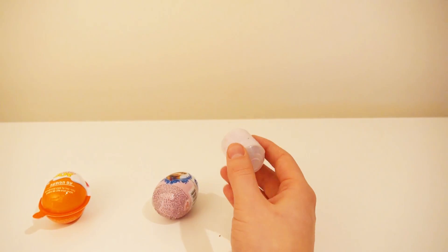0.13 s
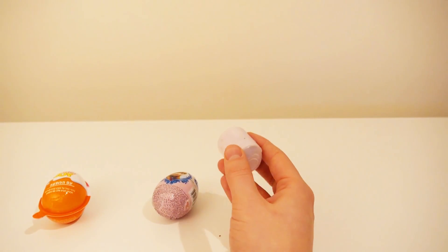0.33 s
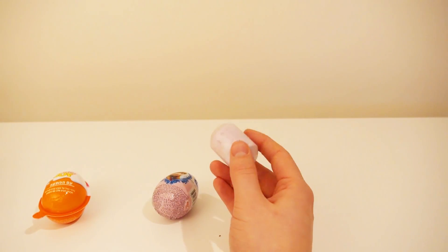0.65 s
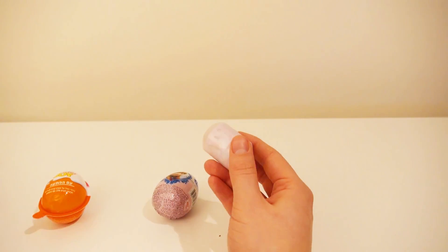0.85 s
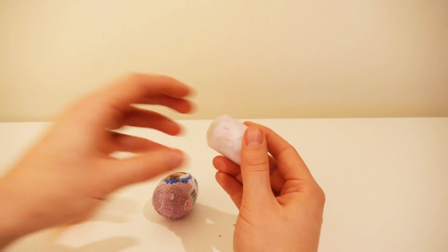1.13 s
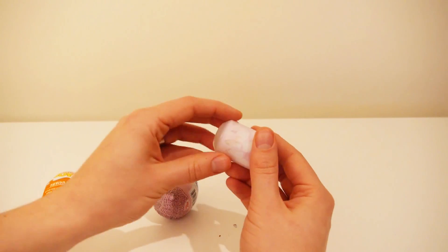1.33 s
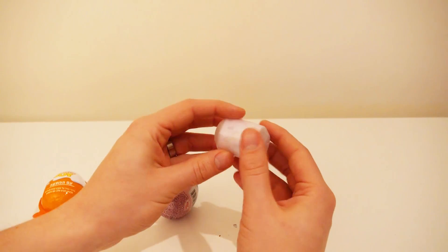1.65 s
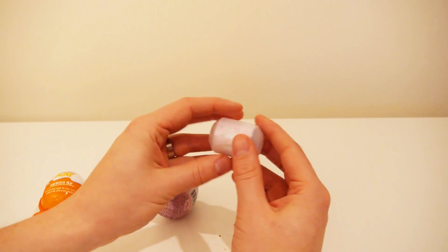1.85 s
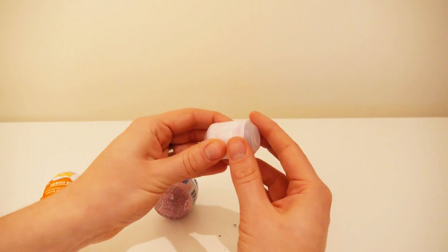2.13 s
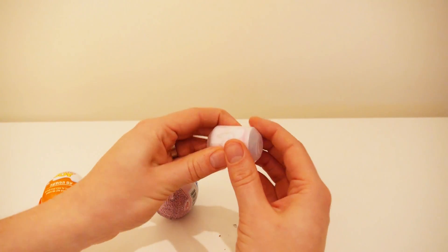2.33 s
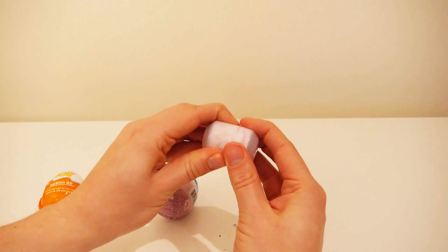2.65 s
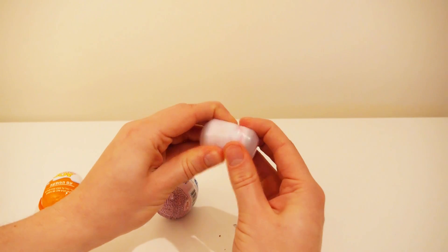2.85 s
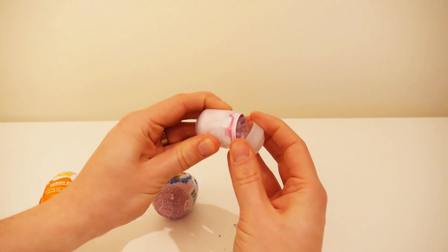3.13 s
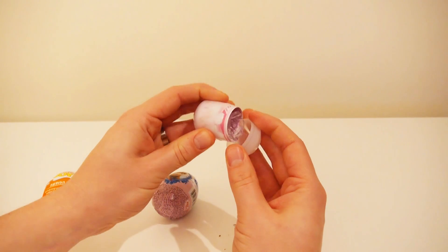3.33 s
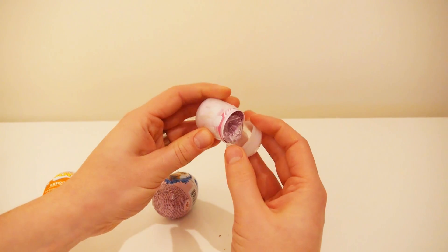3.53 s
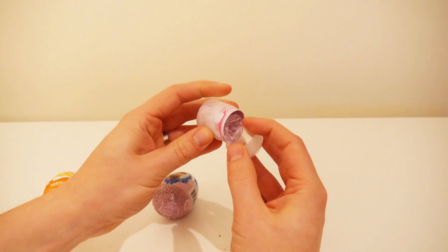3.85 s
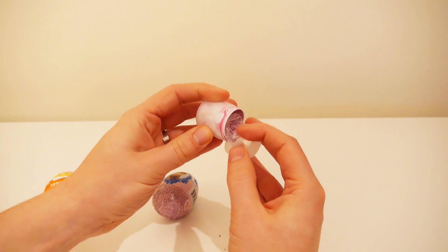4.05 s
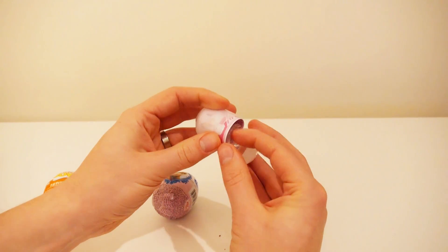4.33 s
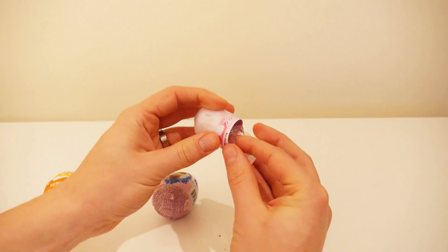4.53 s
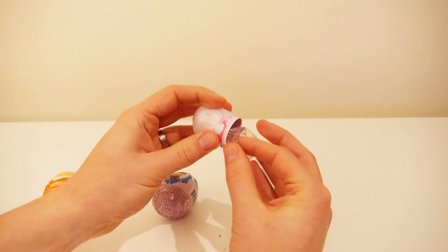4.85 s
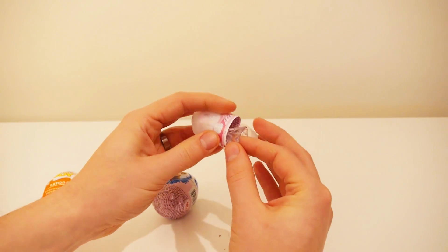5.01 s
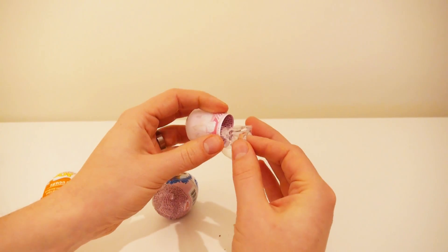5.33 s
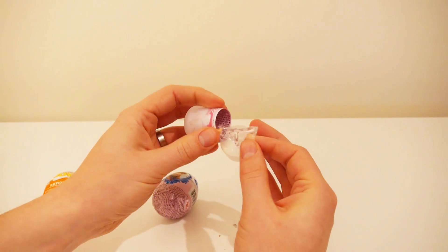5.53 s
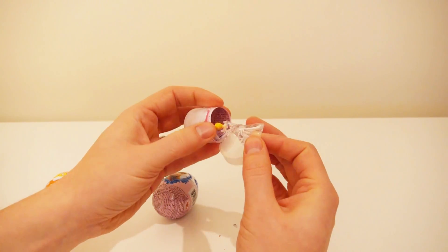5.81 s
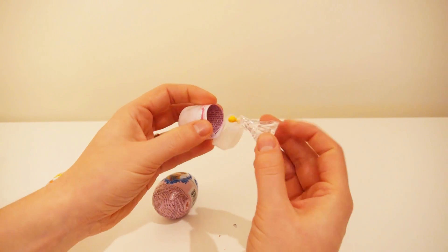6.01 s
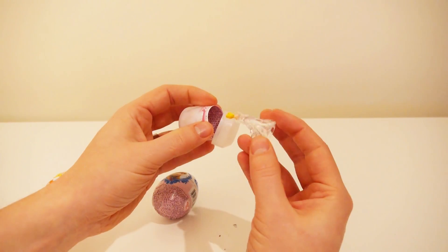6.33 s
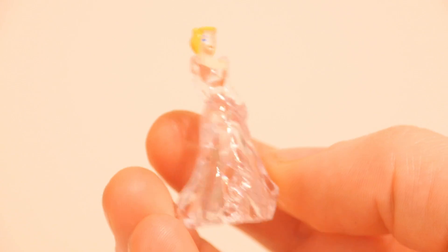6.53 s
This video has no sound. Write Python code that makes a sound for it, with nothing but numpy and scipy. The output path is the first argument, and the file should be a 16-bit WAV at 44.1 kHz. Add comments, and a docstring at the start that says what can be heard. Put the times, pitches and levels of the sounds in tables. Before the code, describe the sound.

Thin plastic crackles under fingers, a small capsule lid pops open and scrapes, then after near silence a hard little figure clacks out.

```python
"""A small plastic toy capsule is turned in the fingers above a table in a quiet room.
Its thin wrapping rustles and crackles: trains of tiny slips ring the facets of the plastic.
The lid lets go with a hollow pop, low damped modes, and scrapes off in short runs of slips.
A hard little figure taps the cup, ringing cup and wall modes, then clacks on the rim as it is drawn out:
short modes of its own, and a grainy ring that lingers and fades, over faint rumble, hiss and hum."""
import sys
import numpy as np
from scipy import signal
from scipy.fft import rfft, irfft
from scipy.io import wavfile

SR = 44100
rng = np.random.default_rng(int(sys.argv[2]) if len(sys.argv) > 2 else 0)


def dump(signal):
    """Clip the signal to [-1, 1] and save it as 16-bit WAV at the path in sys.argv[1]."""
    limited = np.clip(np.atleast_2d(signal).T, -1, 1)
    pcm = np.round(limited * 32767).astype(np.int16)
    wavfile.write(sys.argv[1], SR, pcm)


N = 294407  # length [samples]
POP_S = 2.9908  # moment the lid lets go [s]

# stick-slip bursts of thin plastic: (time [s], level [dB], brightness [dB per octave])
CRACKLES = [(0.044, -44, 1.5), (.068, -44, 11), (0.2127, -30, -2.5), (.245, -41.5, -5.5), (.548, -38.5, -1),
            (0.58, -42, -0.5), (.670, -40.5, 2.5), (0.82, -56.5, -0.5), (0.872, -67, 12),
            (1.012, -56.5, 16), (1.168, -58, 19), (2.3118, -48.5, 3.5), (2.982, -45, -3), (3.135, -65, 11),
            (4.786, -67, 2.5), (4.942, -61.5, 22)]
# how the thin plastic colours a slip: (frequency [Hz], level [dB])
CRACKLE_COLOUR = [(300, -34), (700, -32), (1300, -10.5), (1650, -6), (2100, 3.5), (3000, 1.5), (3600, -3.5),
                  (4600, -0.5), (6800, -12.5), (10000, -15), (15500, -34)]
# knocks on the cup, whose pitch shifts with the grip:
# (time [s], pitch [Hz], level [dB], wall ring relative to that level [dB])
KNOCKS = [(0.584, 860, -42.5, -35), (0.602, 1120, -45.5, -34), (0.608, 442, -52.5, -35),
          (1.81, 2110, -68, -25), (2.067, 2020, -80, 7.5), (3.141, 1240, -52, -40),
          (3.541, 1640, -65.5, -26), (3.6514, 1686, -35.5, -14), (3.654, 2165, -48, -5.5),
          (3.851, 1583, -68.5, -19), (4.3131, 1598, -67, 6), (4.319, 1625, -59, 4), (4.868, 2005, -80, 14),
          (5.3184, 1705, -42.5, -18.5), (5.798, 1840, -32, -5), (5.974, 1145, -27.5, -20.5),
          (6.0116, 1800, -26, -20), (6.089, 1830, -46.5, -23)]
# modes of the hard figure: (frequency [Hz], level [dB], t60 [s])
FIGURE_MODES = [(1460, -23, 0.011), (1970, -21.5, 0.0038), (3126, -33, 0.074), (3065, -11, 0.0098),
                (3380, -33.5, .2), (3388, -0.5, 0.0022), (3460, -29, 0.1), (3720, -30.5, 0.07),
                (4200, -22, 0.011), (4570, -34.5, .14), (5340, -27, 0.0047), (7780, -38.5, 0.0075),
                (12500, -50, .006)]


def amp(db):
    """Decibels to gain."""
    return 10 ** (np.asarray(db) / 20)


def unit(x):
    """Scales to an rms of 1."""
    return x / np.sqrt(np.mean(x ** 2) + 1e-20)


def read(points, hz):
    """Reads a table on a log-frequency axis."""
    f, value = np.transpose(points)
    return np.interp(np.log(hz + 1), np.log(f + 1), value)


def add(mix, s, sound):
    """Mixes a sound in at time s."""
    part = mix[max(round(s * SR), 0):][:len(sound)]
    part += sound[:len(part)]


def octaves(hz):
    """Octaves above 3500 Hz, the middle of the plastic's range; held constant below 500 Hz."""
    return np.log2(np.maximum(hz, 500) / 3500)


def shortened(db, at_db, halving_db):
    """Factor on a duration: 1 at the given level, half as long for each step of halving_db above it."""
    return 2 ** ((at_db - db) / halving_db)


def snap(colour, bright=0, ripple_db=0, size=2048, count=70):
    """A causal click of unit energy with the given spectrum; ripples give each facet its own resonances."""
    hz = abs(np.fft.fftfreq(size, 1 / SR))
    ripple = np.interp(hz, np.linspace(0, SR / 2, count), rng.standard_normal(count))
    log_gain = np.log(amp(read(colour, hz) + bright * octaves(hz) + ripple_db * ripple))
    # minimum phase packs the energy at the start
    click = np.fft.ifft(np.exp(np.conj(signal.hilbert(log_gain)))).real
    return click / np.linalg.norm(click)


def ring(modes, swell_s, bright=0, size=10000):
    """Damped modes that swell while the contact lasts, round off and then die away."""
    t = np.arange(size) / SR
    out = 0
    swell = np.sin(np.pi / 2 * np.minimum(t / swell_s, 1)) ** 2
    # the decay sets in gradually once the swell is over
    age = np.hypot(np.maximum(t - swell_s, 0), swell_s / 2) - swell_s / 2
    for hz, db, t60 in modes:
        level = amp(db + bright * octaves(hz) - 60 * age / t60)
        out = out + level * np.sin(2 * np.pi * hz * t)
    return swell * out


def slips(count, per_s, spread_db):
    """A random train of tiny slips of either sign, a few of them much larger than the rest."""
    chance, size, sign = rng.random((3, count))
    size = np.minimum(-np.log(1 - size), 4)
    return (chance < per_s / SR) * amp(spread_db * size) * np.sign(sign - .5)


def bursts(rows, colour, per_s, spread_db):
    """Each burst is a short run of slips that swells and fades, all ringing the thin plastic."""
    rise, rise_per_s = 0.087, 12  # share of a burst spent swelling; a longer burst starts more softly
    out = np.zeros(N)
    for s, db, length, bright in rows:
        count = max(int(length * SR), 8)
        train = (slips(4096, per_s, spread_db) + .15 * rng.standard_normal(4096))[:count]
        peak_at = np.clip(rise + rise_per_s * length, .01, .9)
        train = train * np.interp(np.linspace(0, 1, len(train)), [0, peak_at, 1], [0, 1, .2])
        sound = signal.fftconvolve(train, snap(colour, bright, ripple_db=3))
        packed = sound / np.linalg.norm(sound) * np.sqrt(SR / 1000)  # level as if packed in 1 ms
        add(out, s, amp(db) * packed)
    return out


def background(side=0.11):
    """Low rumble, faint hiss and a weak electrical hum, nearly mono."""
    # spectrum of the steady background noise, shape only: (frequency [Hz], level [dB])
    floor = [(18, -31.5), (30, 4), (107, -9), (150, -14.5), (195, -10.5), (260, -16), (415, -18),
             (567, -24.5), (612, -19.5), (698, -24), (1060, -25.5), (1370, -29.5), (10700, -51.5),
             (12200, -61.5), (15000, -53.5)]
    # steady hum tones: (frequency [Hz], rms level [dB])
    hum = [(49, -80.5), (205, -82), (238, -83.5), (604, -91.5)]
    floor_db = -68.5
    hz = np.fft.rfftfreq(N, 1 / SR)
    t = np.arange(N) / SR
    spectrum = rfft(rng.standard_normal((2, N))) * amp(read(floor, hz))
    mid, wide = amp(floor_db) * unit(irfft(spectrum, N))
    mid = mid + sum(np.sqrt(2) * amp(db) * np.sin(2 * np.pi * (f * t + rng.random())) for f, db in hum)
    return np.array([mid + side * wide, mid - side * wide])


def stroke(age, length, db):
    """Finger pressure: grips quickly, eases while sliding, then lets go."""
    rise_s, sag_db_per_s, release_db_per_s = 0.007, 39.5, 217
    sag_db = sag_db_per_s * np.maximum(age, 0)
    release_db = release_db_per_s * np.maximum(age - length, 0)
    return np.clip(age / rise_s, 0, 1) * amp(db - (sag_db + release_db))


def rubbing(per_s, spread_db, gain_db, count=6):
    """Dense fine slips under the fingers, which wander from one facet of the wrapping to the next."""
    # how the rubbed wrapping colours a slip: (frequency [Hz], level [dB])
    rub_colour = [(350, -51), (600, -32.5), (678, -22.5), (1390, -8), (1640, -1), (2130, -12), (2280, 0),
                  (2790, 2.5), (3070, -6), (5080, -3.5), (5510, -13), (8870, -14), (15500, -23)]
    # strokes of the fingers over the wrapped capsule: (time [s], length [s], level before gain_db [dB])
    strokes = [(0.0, .2, -47.5), (0.418, 0.12, -73.5), (0.529, 0.19, -55)]
    t = np.arange(N) / SR
    grain = 0
    pressure = sum(stroke(t - s, length, db) for s, length, db in strokes)
    steps = np.arange(0, t[-1], .02)  # each facet's share moves to a new value every 20 ms
    touch = np.array([np.interp(t, steps, rng.random(len(steps)) ** 3) for _ in range(count)])
    for share in touch / np.linalg.norm(touch, axis=0):
        facet = snap(rub_colour, ripple_db=4.5)
        grain = grain + signal.oaconvolve(share * slips(N, per_s / count, spread_db), facet)[:N]
    return amp(gain_db) * pressure * unit(grain)


def crackling():
    """The wrapping buckles in bursts, the hard ones short and the soft ones drawn out."""
    length_s, at_db, halving_db = 0.0092, -39.5, 27  # length at that level; a harder burst is over sooner
    rows = []
    for s, db, bright in CRACKLES:
        rows.append((s, db, length_s * shortened(db, at_db, halving_db), bright))
    return bursts(rows, CRACKLE_COLOUR, per_s=1600, spread_db=3.0)


def soft_rasps(per_s=3000, spread_db=3.5):
    """Trains of fine slips through one band around 3.3 kHz, each swelling and fading."""
    # soft band-limited rasps around 3.3 kHz: (time [s], level [dB], length [s])
    rasps = [(0.289, -67, 0.085), (0.495, -58, 0.094), (.818, -65, 0.027), (2.311, -59, .011),
             (3.914, -77, 0.022), (4.993, -73.5, 0.032), (5.22, -79, 0.047)]
    centre_hz, width_hz = 3296, 1390  # the band that every rasp sings in
    touch_db, touch_s = -65, 0.015  # the small scuff of the finger that sets off a crackle
    out = np.zeros(N)
    edges = [centre_hz - width_hz / 2, centre_hz + width_hz / 2]
    band = signal.butter(5, edges, "band", fs=SR, output="sos")
    # fingers grip the shell only while it is shut
    touches = [(s, touch_db, touch_s) for s, _, _ in CRACKLES if s < POP_S]
    for s, db, length in rasps + touches:
        rasp = signal.sosfilt(band, slips(SR // 2, per_s, spread_db))[:int(length * SR)]
        add(out, s, amp(db) * unit(rasp) * np.sin(np.linspace(0, np.pi, len(rasp))))
    return out


def capsule(flex_swell_s=0.0014, wall_swell_s=0.0014):
    """Every knock rings two low modes of the cup and the higher modes of its wall."""
    # modes of the cup wall: (frequency [Hz], level [dB], t60 [s])
    wall = [(2473, -20.5, 0.0092), (3015, 2, 0.034), (4937, -25.5, 0.061), (6450, -20.5, 0.013),
            (8510, -24, 0.034), (10000, -26.5, 0.016), (11430, -27, 0.016), (13140, -30.5, .02)]
    ring_s, at_db, halving_db = 0.016, -42, 22  # t60 at that level; a firmer contact damps it sooner
    under_ratio, under_db = 0.635, -15.5  # a weaker, lower mode that sounds with every knock
    out = np.zeros(N)
    for s, hz, db, wall_db in KNOCKS:
        t60 = ring_s * shortened(db, at_db, halving_db)
        low = ring([(hz, 0, t60), (under_ratio * hz, under_db, t60)], flex_swell_s)
        add(out, s, amp(db) * (low + amp(wall_db) * ring(wall, wall_swell_s)))
    return out


def grit():
    """No knock is clean: the surfaces slip a little as they meet, with a brief dull rasp."""
    relative_db, length_s, db_per_octave = -15.5, 0.0053, -7.5  # level relative to the knock
    rows = [(s, db + relative_db, length_s, db_per_octave) for s, _, db, _ in KNOCKS]
    return bursts(rows, CRACKLE_COLOUR, per_s=2300, spread_db=4.0)


def pop():
    """The lid lets go with a low thump of air; then the air of the open cup sings briefly."""
    # modes of the thump, ahead of its low-pass: (frequency [Hz], level [dB], t60 [s])
    thump = [(185, -48, 0.019), (366, -29.5, 0.017), (430, -41.5, 0.13)]
    # air modes of the opened cup: (frequency [Hz], level [dB], t60 [s])
    open_cup = [(844, -56.5, 0.035), (1176, -39.5, .028)]
    pop_swell_s, pop_top_hz = 0.0023, 580
    open_delay_s, open_swell_s = .02, 0.0078
    out = np.zeros(N)
    low_pass = signal.butter(4, pop_top_hz, fs=SR, output="sos")
    add(out, POP_S, signal.sosfilt(low_pass, ring(thump, pop_swell_s)))
    add(out, POP_S + open_delay_s, ring(open_cup, open_swell_s))
    return out


def lid_scrape():
    """The lid scrapes over its catch in short runs of slips that ring its plastic."""
    # runs of slips: (time [s], level [dB], length [s], brightness [dB per octave])
    lid_slips = [(2.9919, -37, 0.0042, -5.5), (2.9962, -31, 0.011, -2.5), (3.006, -37, 0.02, -4)]
    # how the lid colours a slip: (frequency [Hz], level [dB])
    lid_colour = [(150, -14.5), (400, -13.5), (600, -13), (900, -12.5), (1250, -3), (2100, -5.5),
                  (3200, -7), (5000, -2), (7000, -9), (10000, -2.5), (13000, -11), (15500, -21)]
    return bursts(lid_slips, lid_colour, per_s=1500, spread_db=0.5)


def figure(crack_db=-27, crack_t60=0.053):
    """Hard plastic on the rim: short modes and a faint broad crack at the contact."""
    # the figure striking the rim: (time [s], level [dB], brightness [dB per octave])
    clacks = [(5.3224, -43, 4.5), (5.7976, -22.5, -4), (5.802, -21, 1), (5.8139, -25.5, 1.5),
              (5.8315, -38, -2.5), (5.9742, -6, 2.5)]
    # spectrum of the crack: (frequency [Hz], level [dB])
    colour = [(450, -44.0), (700, -21.0), (1050, 5.0), (2400, 3.0), (4500, 0.0), (6600, -9.0),
              (8000, -16.5), (10000, -19), (13000, -23.5), (15000, -37.0)]
    out = np.zeros(N)
    t = np.arange(SR // 40) / SR
    for s, db, bright in clacks:
        noise = rng.standard_normal(len(t)) * amp(-60 * t / crack_t60)
        crack = signal.fftconvolve(noise, snap(colour, bright))
        add(out, s, amp(db) * ring(FIGURE_MODES, swell_s=0.0013, bright=bright))
        add(out, s, amp(db + crack_db) * crack)
    # so small a part radiates little bass
    return signal.sosfilt(signal.butter(3, 850, "high", fs=SR, output="sos"), out)


def grainy_ring(per_s=1200, spread_db=3):
    """A grainy ring near 3.4 kHz lingers and fades after the clacks: random impulses excite damped modes."""
    # stretches of grainy ring: (time [s], level at the start of the fade [dB], length [s])
    stretches = [(5.8, -55, 0.23), (5.989, -52.5, 0.18)]
    fade_db_per_s, edge_s = 47, .02
    low_hz, high_hz = 2750, 4380
    out = np.zeros(N)
    modes = ring(FIGURE_MODES, swell_s=0.0012)
    band = signal.butter(5, [low_hz, high_hz], "band", fs=SR, output="sos")
    for s, db, length in stretches:
        t = np.arange(int(length * SR)) / SR
        ringing = signal.fftconvolve(slips(SR // 2, per_s, spread_db), modes)
        grain = signal.sosfilt(band, ringing)[:len(t)]
        edges = np.minimum(np.minimum(t, length - t) / edge_s, 1)
        level = edges * amp(db - fade_db_per_s * t)
        add(out, s, level * unit(grain))
    return out


def room(x, wet_db, left_db, side=1., build_s=0.0026):
    """Direct sound, near reflections and a short diffuse tail; the two sides differ most in the treble."""
    # reflections from table, hands and wall: (delay [s], gain [ratio])
    echoes = [(.0038, 0.31), (.0052, 0.088), (.0076, 0.075), (0.01, 0.12), (0.014, -0.067), (0.0158, 0.078)]
    # decay of the tail: (frequency [Hz], t60 [s])
    decay = [(200, 0.18), (1000, 0.25), (2000, 0.22), (3500, 0.19), (6000, 0.23), (12000, 0.15)]
    # width of the tail, before the factor side: (frequency [Hz], side-to-mid [ratio])
    spread = [(200, .15), (600, 0.38), (1500, .25), (3000, 0.7), (5000, 0.44), (8000, 0.85), (14000, 0.51)]
    count = SR // 2
    t = np.arange(count) / SR
    # sparse random taps, each frequency band with its own decay
    taps = rng.choice([-1., 1.], (2, count)) * (rng.random((2, count)) < 1 / 8)
    hz, age, z = signal.stft(taps, SR, nperseg=256)
    decayed = z * amp(-60 * age / read(decay, hz)[:, None])
    tail = signal.istft(decayed, SR, nperseg=256)[1][:, :count]
    tail = tail * (1 - np.exp(-(t / build_s) ** 2))
    mid, wide = amp(wet_db) * tail / np.linalg.norm(tail, axis=1, keepdims=True)
    wide = side * irfft(rfft(wide) * read(spread, np.fft.rfftfreq(count, 1 / SR)), count)
    mid[0] += 1  # direct sound
    for delay, gain in echoes:
        add(mid, delay, gain * np.array([1, 2, 1]) / 4)  # slightly dulled
    # left_db is the level of left over right
    pair = np.array([mid + wide, mid - wide]) * amp([[left_db / 2], [-left_db / 2]])
    end_fade = np.minimum(1, 10 * (1 - t / t[-1]))
    return signal.oaconvolve(x[None], pair * end_fade, axes=1)[:, :N]


def scene():
    """Places each source in the room; the hands shield the rubbing, so more of it arrives by way of the room."""
    wrapping = rubbing(per_s=2300, spread_db=2.5, gain_db=-4.0) + crackling()
    shell = lid_scrape() + soft_rasps()
    cup = capsule() + pop() + grit()
    rim = figure() + grainy_ring()
    return (background()
            + room(wrapping, wet_db=-1.0, left_db=1.76, side=.85)
            + room(shell, wet_db=-4.5, left_db=0.3, side=0.8)
            + room(cup, wet_db=-7.0, left_db=0.3, side=.8)
            + room(rim, wet_db=-4.5, left_db=0.0, side=0.6))


def record(dry, low_hz=32, edge_hz=15750):
    """The microphone sheds the lowest rumble; then a steep low-pass sets the band limit."""
    dry = signal.sosfilt(signal.butter(2, low_hz, "high", fs=SR, output="sos"), dry)
    low_pass = signal.firwin(511, edge_hz, window=("kaiser", 9), fs=SR)
    return signal.oaconvolve(dry, low_pass[None], "same")


dry = scene()
out = record(dry)
dump(out)
```